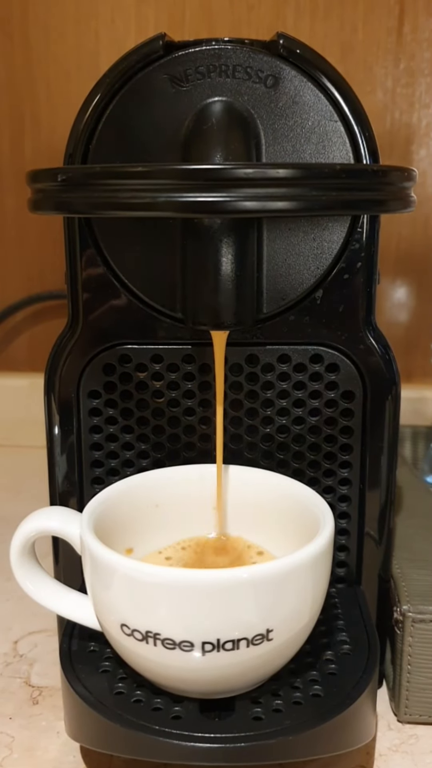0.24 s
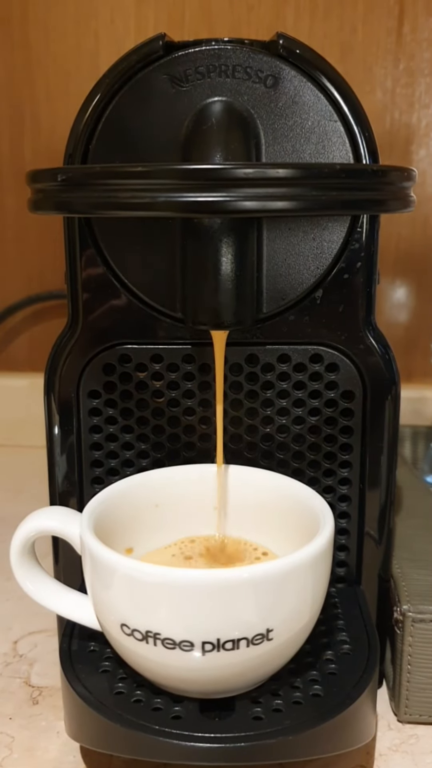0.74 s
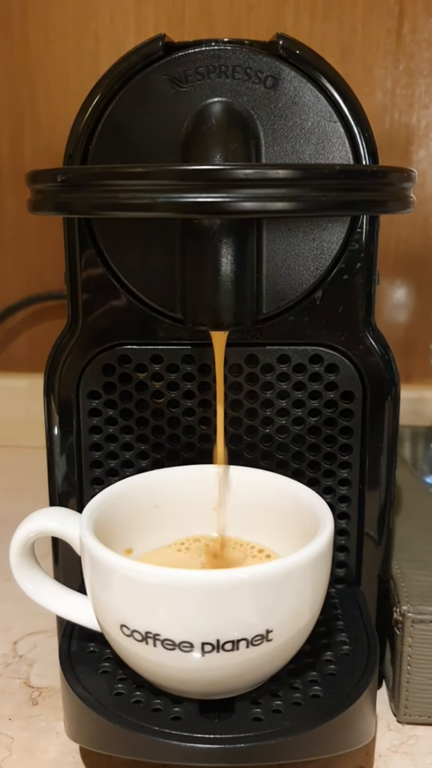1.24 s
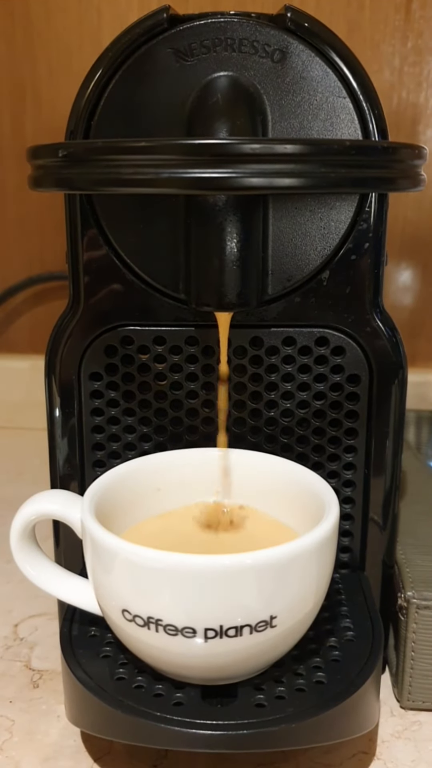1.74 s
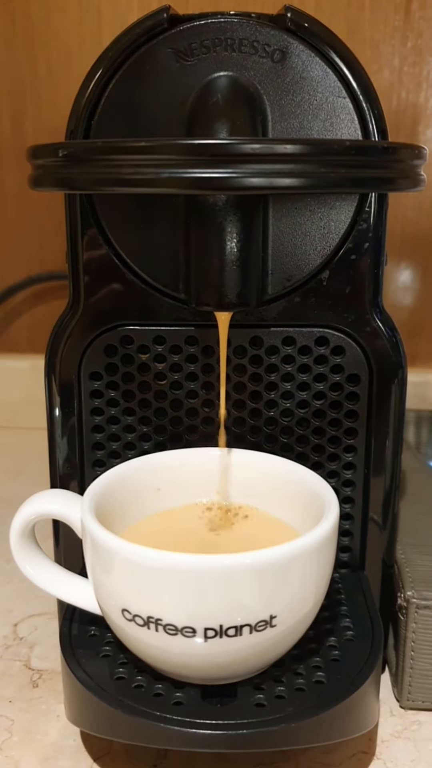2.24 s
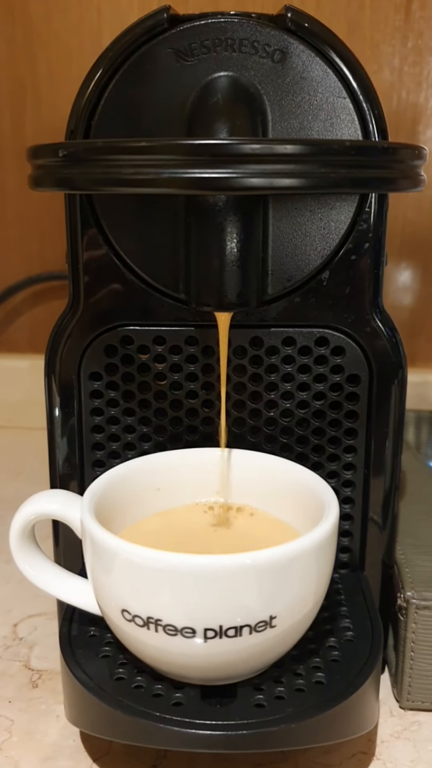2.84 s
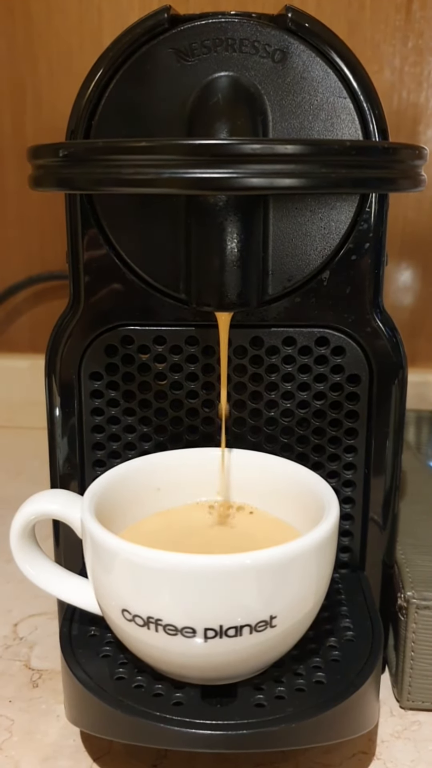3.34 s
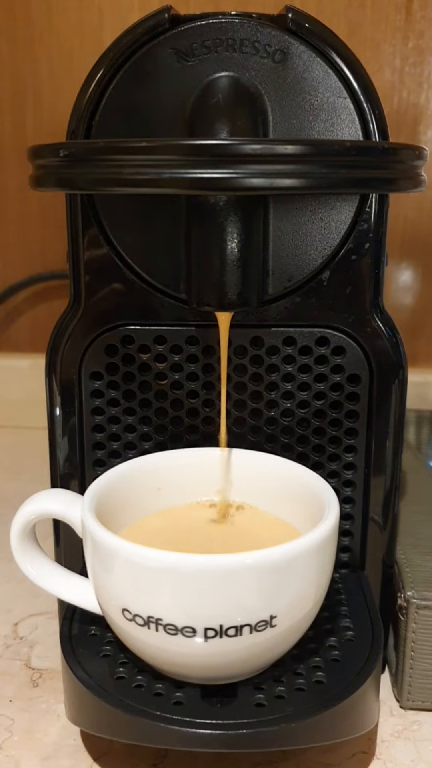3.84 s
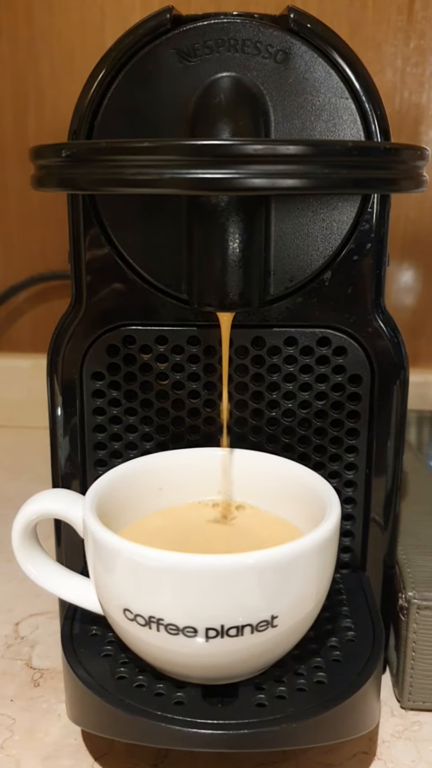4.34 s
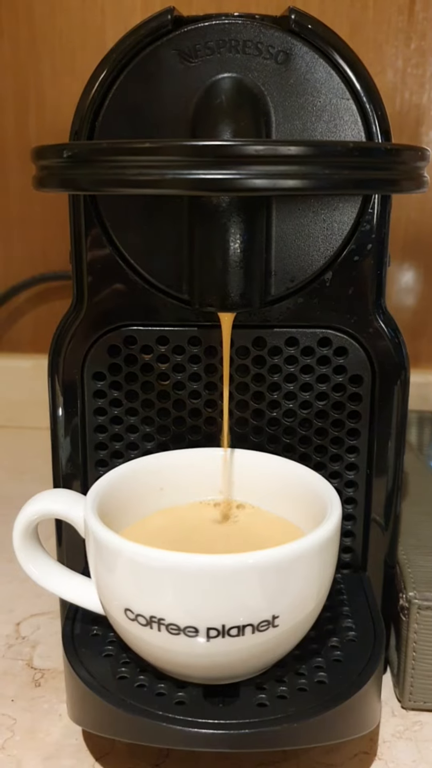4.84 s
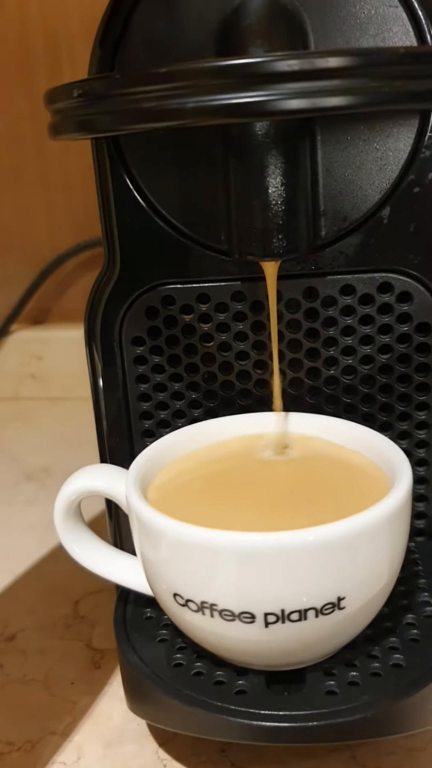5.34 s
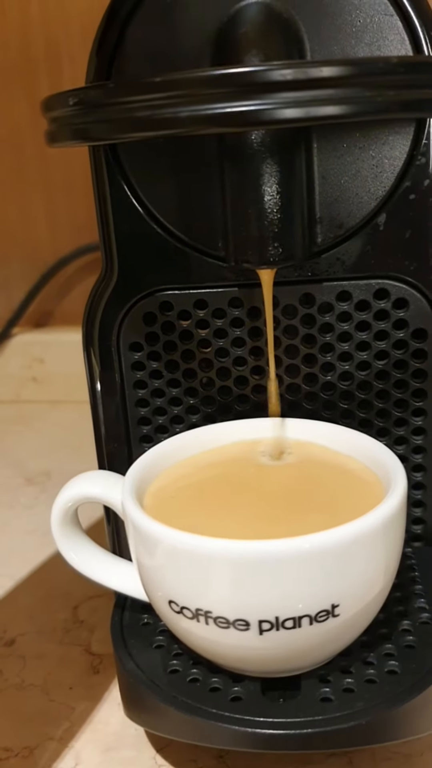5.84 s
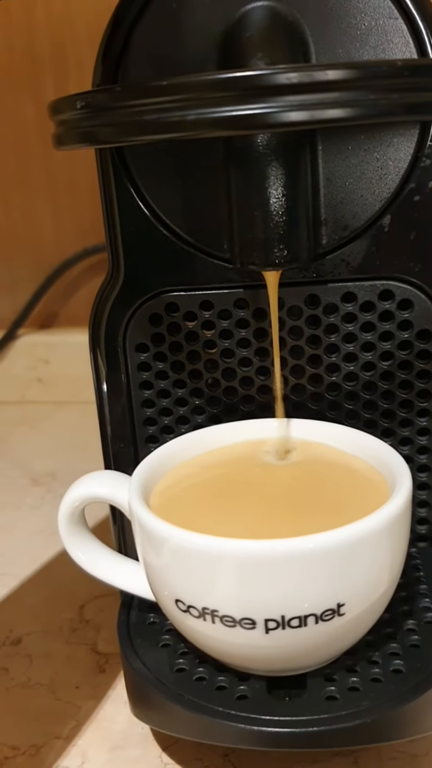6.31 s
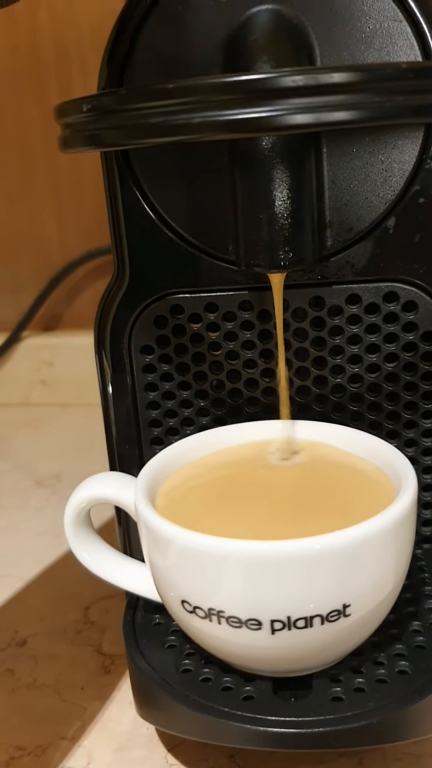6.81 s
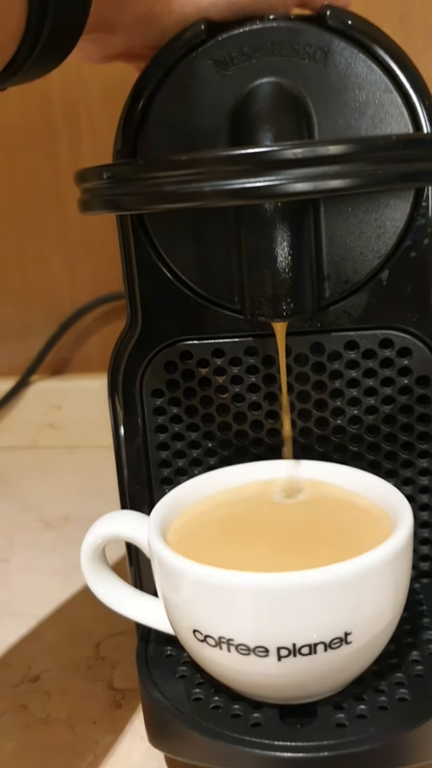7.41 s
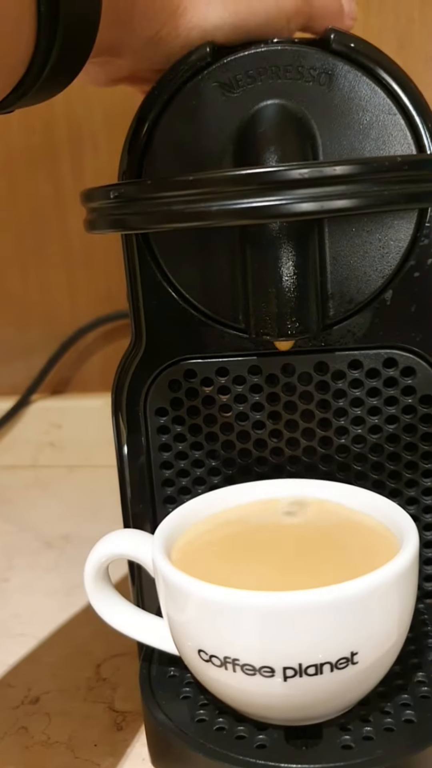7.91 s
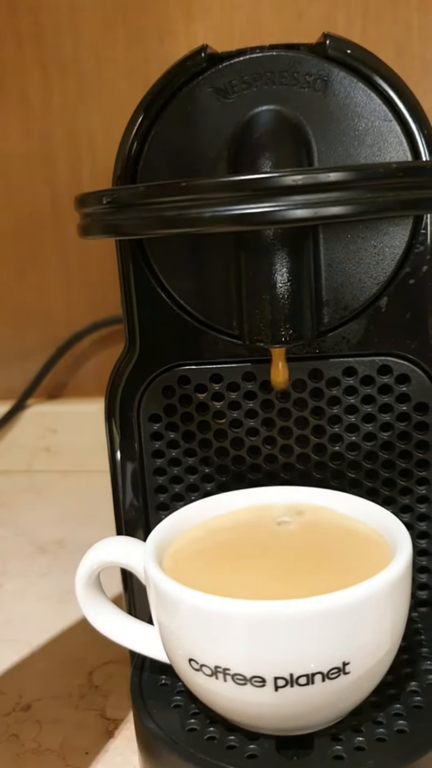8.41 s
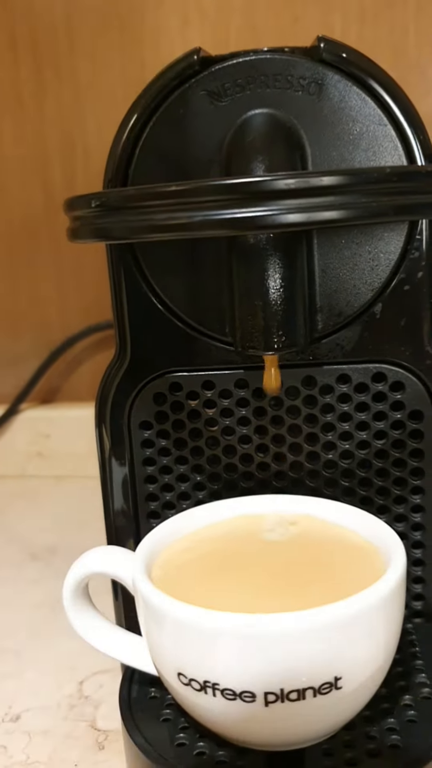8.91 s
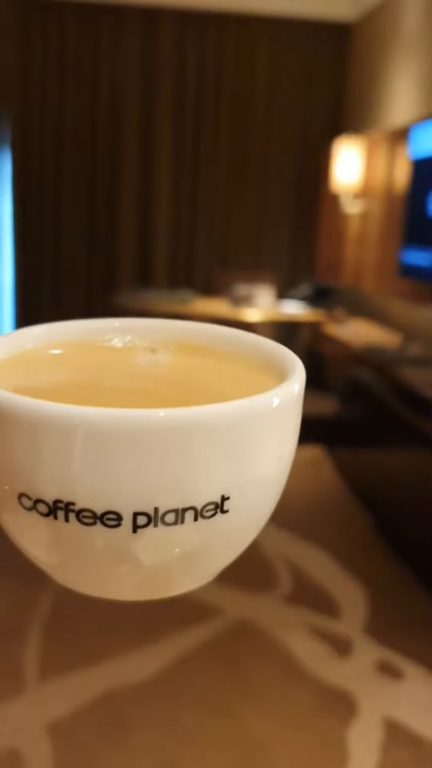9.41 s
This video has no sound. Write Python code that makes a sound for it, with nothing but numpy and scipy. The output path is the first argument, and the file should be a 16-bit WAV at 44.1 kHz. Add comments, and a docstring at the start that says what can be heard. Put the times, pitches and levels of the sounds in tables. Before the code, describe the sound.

A coffee machine pump buzzes and rattles as drops plop into a cup, then stops with a clunk and a few plastic ticks.

```python
"""A capsule coffee machine in a quiet room, heard from a hand-held stereo microphone.
The mains-driven piston pump buzzes its plastic housing, rattling hard at first and softer from 1.65 s,
while drops plop into the cup. At 5.4 s the pump stops; a lever clunks home and rocks to rest.
Plastic parts tick, escaping pressure whistles faintly, and a few dull knocks sound over the
microphone's low rumble and hiss."""
import sys
import numpy as np
from scipy import signal
from scipy.fft import rfft, irfft
from scipy.io import wavfile

SR = 44100
rng = np.random.default_rng(int(sys.argv[2]) if len(sys.argv) > 2 else 0)


def digitize_waveform(pressure):
    """Quantize a signal to 16-bit integers and store it at the path in sys.argv[1].

    Rows of a 2-D input are taken as channels; values are limited to [-1, 1].
    """
    field = np.atleast_2d(pressure).T
    bounded = np.clip(field, -1, 1)
    quanta = np.round(bounded * 32767).astype(np.int16)
    wavfile.write(sys.argv[1], SR, quanta)


N = 426094
TIME, HZ = np.arange(N) / SR, np.fft.rfftfreq(N, 1 / SR)
MAINS_HZ, SOFTER_S, STOP_S = 50.015, 1.653, 5.424


def hard_pump():
    """The pump's first stage: the piston strikes hard and the housing rattles brightly."""
    # mains overtones: multiple, start_db, end_db, pan_db, left_lead_rad
    overtones = [(1, -51, -52, 1, -0.4), (2, -45, -46, -8, 0.2), (3, -36, -36, 0, -0.1),
                 (4, -49, -49, 2, 0.3), (5, -51, -50, -1, -0.3), (6, -48, -47, -1, 0.0),
                 (7, -54, -51, -5, -0.4), (8, -46, -47, -3, 0.3), (9, -58, -57, 0, 0.1),
                 (10, -52, -60, 0, -0.0), (11, -42, -44, -2, -0.2), (12, -48, -56, -4, -0.2),
                 (13, -40, -42, -3, -0.3), (14, -50, -53, 3, -0.0), (15, -46, -53, -2, -0.9),
                 (16, -55, -54, -12, -1.5), (17, -50, -52, 7, 2.3), (18, -44, -45, -5, -1.8),
                 (19, -47, -53, -12, 1.9), (20, -45, -48, -8, 0.1), (21, -51, -52, 2, 2.1),
                 (22, -40, -41, -1, 3.1), (23, -45, -47, -2, 3.1), (24, -48, -53, -10, 0.6),
                 (25, -57, -54, -3, 1.7), (26, -55, -55, 1, 1.6), (27, -54, -55, 0, 1.8),
                 (28, -57, -59, -2, 2.9), (29, -56, -57, -5, 1.4), (30, -54, -56, -6, 1.4),
                 (31, -57, -57, 11, -1.4), (32, -60, -64, 2, -3.1)]
    # stroke noise: frequency_hz, density_db
    colour = [(24, -53.5), (40, -16), (147, -13.5), (243, -16), (402, -17.5), (491, -17.5), (646, -17.5),
              (715, -19.5), (3220, -20.5), (5870, -20.5), (7540, -28.5), (12100, -31.5), (16000, -44)]
    # rattling parts: pitch_hz, width_hz, delay_s, decay_s, pan_db
    parts = [(1850, 300, .014, .005, -2), (2350, 400, .014, .006, 0), (3800, 130, 0, .002, 2),
             (3950, 150, .015, .002, 2), (5270, 130, .001, .002, 3), (5760, 90, .0005, .002, 3),
             (5970, 100, .001, .003, 3), (6470, 90, .005, .002, 4), (9100, 400, .0005, .003, 5),
             (11800, 300, .001, .0015, 6), (14000, 1500, .001, .003, 6)]
    # loudness of each part: rms_db, change_over_stage_db
    levels = [(-52.5, -5.5), (-48.5, -0.5), (-44.5, -3), (-52.5, 3.5), (-51.5, -4), (-44, -1), (-46.5, 4.1),
              (-51, -1), (-59, -1), (-53, -0.5), (-62, -3.5)]
    t, strike = TIME[:round(SOFTER_S * SR)], .36   # strike: place in the mains cycle, 0-1
    buzz = piston_buzz(t, overtones, delay=.328, recoil=.275, smear_rad=-.03, phase_rad=1.03, waver_db=.25)
    hiss = stroke_hiss(t, strike, colour, rms_db=-46, decay_s=.016, steady=.15)
    rattle = rattles(t, strike, parts, levels, uneven_db=.8, repeat=6, firmness=.26)
    return add(np.zeros((2, N)), 0, buzz + hiss + rattle)


def soft_pump():
    """The pump's second stage: the buzz carries on with less rattle and a steadier hiss."""
    # mains overtones: multiple, start_db, end_db, pan_db, left_lead_rad
    overtones = [(1, -53, -54, 2, -0.3), (2, -50, -51, -8, 0.3), (3, -39, -40, 0, -0.1),
                 (4, -46, -45, 1, 0.2), (5, -44, -44, 0, -0.0), (6, -43, -44, 0, 0.2),
                 (7, -48, -48, -3, -0.2), (8, -51, -51, -4, 0.3), (9, -55, -51, 0, 0.1),
                 (10, -51, -59, 1, 0.0), (11, -40, -43, -1, -0.0), (12, -50, -58, -2, -0.2),
                 (13, -52, -60, -1, -0.3), (14, -52, -54, 1, -0.8), (15, -60, -61, -4, -0.3),
                 (16, -64, -64, -5, -0.4), (17, -53, -52, -7, 0.3), (18, -53, -55, -2, -2.6),
                 (19, -57, -60, -10, 2.6), (20, -61, -60, -9, 0.2), (21, -51, -51, -4, 2.3),
                 (22, -48, -55, -1, 2.4), (23, -70, -72, -8, 0.6), (24, -61, -57, 2, 1.4),
                 (25, -63, -74, 2, 0.8), (26, -65, -65, -1, -0.8), (27, -62, -60, -9, -2.2),
                 (28, -68, -68, 7, 1.7), (29, -65, -71, 1, 0.6), (30, -72, -80, -2, -1.9),
                 (31, -67, -68, -2, 1.8), (32, -68, -71, 6, -2.9)]
    # stroke noise: frequency_hz, density_db
    colour = [(24, -49.5), (40, -12), (151, -19.5), (305, -14.5), (491, -17), (542, -10), (770, -24.5),
              (852, -24), (2050, -23.5), (3100, -32.5), (4240, -27.5), (5870, -36), (13800, -42.5),
              (16000, -76.5)]
    # rattling parts: pitch_hz, width_hz, delay_s, decay_s, pan_db
    parts = [(1200, 500, .004, .006, -1), (2290, 200, .001, .008, -1), (2620, 200, .001, .005, 0),
             (3760, 200, .0005, .003, 0), (4260, 250, .004, .005, 0), (5420, 150, .001, .006, 0),
             (6610, 300, .001, .006, 1), (8000, 400, .005, .006, 2), (8900, 350, .0062, .006, 2),
             (13500, 1800, .0005, .01, 4)]
    # loudness of each part: rms_db, change_over_stage_db
    levels = [(-60, -0.5), (-61.5, -3.5), (-61.5, -10), (-62.5, 4.5), (-59, 3.5), (-71, 0.5), (-66, -5.3),
              (-70.5, -2), (-62.5, .1), (-62, -0.8)]
    t, strike = TIME[round(SOFTER_S * SR):round(STOP_S * SR)], .92
    buzz = piston_buzz(t, overtones, delay=.266, recoil=.575, smear_rad=.075, phase_rad=1.37, waver_db=.1)
    hiss = stroke_hiss(t, strike, colour, rms_db=-51, decay_s=.018, steady=.82)
    rattle = rattles(t, strike, parts, levels, uneven_db=.6, repeat=10, firmness=.13)
    return add(np.zeros((2, N)), SOFTER_S, buzz + hiss + rattle)


def piston_buzz(t, overtones, delay, recoil, smear_rad, phase_rad, waver_db):
    """Mains overtones line up as a smeared blow and its recoil; delay and recoil are in cycles."""
    along, out = (t - t[0]) / (t[-1] - t[0]), 0
    for k, start_db, end_db, pan_db, lead_rad in overtones:
        phase = 2 * np.pi * k * (MAINS_HZ * t - delay) + smear_rad * k * k + phase_rad
        phase += np.angle(1 - .85 * np.exp(-2j * np.pi * k * recoil))   # return blow, opposite in sign
        level_db = start_db + (end_db - start_db) * along + waver_db * np.sqrt(k) * drift(22)[:len(t)]
        tone = np.cos(phase + np.array([[.5], [-.5]]) * lead_rad)
        out = out + panned(amp(level_db) * tone, pan_db)
    return out


def stroke_hiss(t, strike, colour, rms_db, decay_s, steady):
    """Noise pulsed by each piston stroke, over a steady share that never stops."""
    # how alike left and right are: frequency_hz, correlation
    likeness = [(60, 1), (180, 1), (550, 0.55), (1650, 0.071), (4970, 0.62), (15000, -0.73)]
    # left over right: frequency_hz, pan_db
    balance = [(60, 6.5), (180, 4), (550, -3.5), (1650, 1), (4970, -4), (15000, 20)]
    noise = coloured(colour, at_hz(likeness, HZ), at_hz(balance, HZ))[:, :len(t)]
    return amp(rms_db) * rms_one(noise * (steady + bursts(t, strike, decay_s, uneven_db=2)))


def rattles(t, strike, parts, levels, uneven_db, repeat, firmness):
    """Each stroke shakes the plastic parts, and each part rings around its own pitch."""
    # strokes that barely rattle the parts: time_s
    weak_strokes = [.935, 1.315, 1.575]
    strength_db = 1.5 * rng.standard_normal(600)   # one per stroke; parts below 4 kHz follow it less
    strength_db[(np.array(weak_strokes) * MAINS_HZ - strike).astype(int) + 2] = -15
    from_middle, out = np.linspace(-.5, .5, len(t)), 0
    cycle_sample = (t * MAINS_HZ % 1 / MAINS_HZ * SR).astype(int)
    for (hz, width_hz, delay_s, decay_s, pan_db), (rms_db, change_db) in zip(parts, levels):
        recurring = repeat * np.exp(-(hz / 3200) ** 2) * rng.standard_normal(900)[cycle_sample]
        # every stroke rings the part as firmly, in a new phase and a little off pitch
        stroke = np.floor((t - delay_s) * MAINS_HZ - strike).astype(int) + 2
        phase = 2 * np.pi * rng.random(600)[stroke]
        pitch_hz = hz + .2 * width_hz * rng.standard_normal(600)[stroke]
        tone_gain = firmness * min(hz / 3000, 1) ** 4 * np.sqrt(min(width_hz, 250) / 100)
        tone = tone_gain * np.cos(2 * np.pi * pitch_hz * t + phase)
        shared = recurring + tone + rng.standard_normal(len(t))
        shaking = np.array([shared, np.roll(shared, round(SR / hz / 4))])   # right: a quarter wave late
        shaking += .97 * rng.standard_normal((2, len(t)))
        shaking *= bursts(t, strike + delay_s * MAINS_HZ, decay_s, uneven_db * min(hz / 4500, 1) ** 2)
        # parts near 2.4 kHz rattle harder just before the stop
        rougher_db = 8 * (t > 5.24) * np.exp(-(hz / 2400 - 1) ** 2 * 10)
        slow_db = change_db * from_middle + .66 * drift(2.8)[:len(t)]
        shaking *= amp(strength_db[stroke] * min(hz / 4000, 1) + slow_db + rougher_db)
        out = out + panned(amp(rms_db) * rms_one(ring(shaking, hz, 2.2 / width_hz)), pan_db)
    return out


def drops():
    """Each drop makes a splat and a short rising bubble, answered by the air in the cup."""
    # drops into the cup: start_s, bubble_db, bubble_hz, cup_re_bubble_db, splat_re_bubble_db
    falls = [(0.0864, -52.5, 1930, 11, -8.5), (0.2369, -39, 1760, -0.5, 6), (0.3277, -32.5, 1820, -9, -6.5),
             (0.4998, -31, 1830, -13, -6), (0.6194, -47.5, 2230, 1, 9), (0.8909, -41, 1900, -4.5, -2),
             (1.4436, -46.5, 2160, 2, -13), (1.9594, -53, 1840, 5, 2), (2.0777, -37.5, 1710, -4, -1),
             (2.1201, -41, 1800, -4, 6.5), (2.7, -52, 1830, -6, -2), (2.859, -55, 1850, -8, 15),
             (3.13, -50, 1850, -12, 4), (3.187, -47.5, 1840, -9, 5), (3.995, -53, 1830, -6, -2)]
    # spray of a drop: frequency_hz, density_db
    spray = [(500, -33.5), (900, -7.5), (2000, -3.5), (3400, -4.5), (6000, -14), (12000, -30.5)]
    t, out = np.arange(2000) / SR, np.zeros((2, N))
    for start_s, level_db, hz, cup_db, splat_db in falls:
        bubble = np.sin(2 * np.pi * hz * t * (1 + 4 * t)) * t / .0016 * np.exp(1 - t / .0016)
        cup_hz = 833 + 50 * rng.standard_normal()
        cup = np.sin(2 * np.pi * cup_hz * t) * t / .006 * np.exp(1 - t / .006)
        splat = crack(spray, decay_s=.0032)[:len(t)]
        plop = bubble + amp(cup_db) * cup + amp(splat_db) * splat
        add(out, start_s, panned(amp(level_db) * plop, 0))
    return out


def lever():
    """Each contact is a dry crack, much alike from hit to hit, and a push into the housing's modes."""
    # lever clunking home: start_s, level_db, body_re_level_db, pan_db, snap_re_usual_db
    clunks = [(5.532, -33.5, 2, 11, 29), (5.5363, -38, 17, -1, 4.5), (5.548, -54.5, 14.5, -15, 1),
              (5.5629, -58.5, 0.5, -37, 4.5), (5.877, -26.5, -23, 4.5, 29.5), (5.9279, -55, 10.5, -1, -1)]
    # lever rocking to rest: start_s, level_db
    rocking = [(5.95, -30.5), (6.0034, -35), (6.0586, -37.5), (6.1167, -38.5), (6.1723, -39.5),
               (6.22, -44.5), (6.261, -41), (6.3029, -45.5), (6.3405, -49.5), (6.379, -56), (6.4188, -64)]
    # the dry crack: frequency_hz, density_db
    crack_colour = [(100, -55), (600, -20), (1500, -17), (2600, -6), (3400, -6), (3900, 2), (4300, -4),
                    (4800, 2), (5600, -10), (7000, -13), (8000, -20), (11000, -21), (15000, -42)]
    # bright edge of a hard contact: frequency_hz, density_db
    snap_colour = [(2000, -31), (6000, -3), (10000, -6.5), (13000, -13), (16000, -25)]
    # damped modes of the housing: pitch_hz, level_db, t60_s
    modes = [(310, -7, .04), (440, -5, .035), (565, 0, .035), (673, -2, .03), (855, -5, .022),
             (1190, -7, .02), (1476, -8, .014), (1740, -9, .014)]
    out, usual_crack = np.zeros((2, N)), crack(crack_colour, decay_s=.0012)
    push = np.pad(np.hanning(12), (0, 3988))
    # while the lever rocks, the housing's ring falls 19.5 dB a second
    rocks = [(s, db, -49.5 - 19.5 * (s - rocking[0][0]) - db, 2.5, -16) for s, db in rocking]
    for start_s, level_db, body_db, pan_db, snap_db in clunks + rocks:
        tick = .68 * usual_crack + .61 * crack(crack_colour, decay_s=.00363)
        snap = amp(snap_db - 34.5) * crack(snap_colour, decay_s=.0015)
        body = sum(amp(db + rng.normal(0, .88)) * rng.choice([-1, 1]) * ring(push, hz, t60_s)
                   for hz, db, t60_s in modes)
        contact = tick + snap + amp(body_db) * peak_one(body)
        add(out, start_s, panned(amp(level_db) * contact, pan_db))
    return out


def plastic_ticks():
    """Plastic parts tick: milliseconds of crackle, broadly coloured around each tick's brightness."""
    # ticks: start_s, peak_db, brightness_hz, pan_db, body_db
    ticks = [(5.715, -48.5, 2480, 6, 10.5), (5.7977, -68, 6560, 9, -8), (5.842, -68, 4720, 10.5, -26),
             (6.5538, -33, 4050, 5, -8.5), (6.6635, -65, 8000, 17.5, -10), (6.7466, -56.5, 6910, 13, -11.5),
             (6.7839, -38.5, 3970, 5.5, -9.5), (7.215, -59.5, 6800, 13.5, -16),
             (7.2389, -58.5, 7000, 14.5, -15), (7.3552, -63.5, 8770, 7, -4), (7.437, -40, 4540, 5.5, -5),
             (8.0934, -48, 6610, 11, -3), (8.103, -37.5, 6450, 3, -1), (8.1274, -55, 6220, -13, 6),
             (8.2556, -64, 2500, 0.1, -6), (9.298, -75, 1200, -2, 12), (9.392, -69, 1670, -5.5, 7)]
    out = np.zeros((2, N))
    for start_s, peak_db, hz, pan_db, body_db in ticks:
        colour = [(100, -50), (400, body_db - 4), (hz * .57, body_db), (hz, 0),
                  (max(hz * 1.13, 7300), -5), (9300, -13.5), (15500, -28.5)]
        add(out, start_s, panned(amp(peak_db) * crack(colour, decay_s=.0017), pan_db))
    return out


def dull_knocks():
    """Soft puffs of noise ring briefly at a low pitch."""
    # knocks: start_s, peak_db, pitch_hz, pan_db
    knocks = [(5.471, -33.5, 430, -2), (5.484, -37, 292, 0), (5.494, -47, 246.7, -1.5),
              (8.29, -60, 710, -2), (8.297, -60, 800, -10), (8.315, -53.5, 561, 3), (8.965, -57.5, 125, -9),
              (9.293, -59.5, 176, -15), (9.305, -62.5, 130, -16.5), (9.466, -72, 500, -6.5)]
    t, out = np.arange(4000) / SR, np.zeros((2, N))
    for start_s, peak_db, hz, pan_db in knocks:
        puff = rng.standard_normal(len(t)) * t * np.exp(-t / .00063)
        add(out, start_s, panned(amp(peak_db) * peak_one(ring(puff, hz, 18 / hz)), pan_db))
    return out


def pressure_whistle():
    """Escaping pressure whistles faintly in a narrow band of noise."""
    # swell and fade of the whistle: time_s, level_db
    swell = [(6.75, -110), (6.85, -84), (7.14, -80), (7.3, -105)]
    whistle = rms_one(ring(rng.standard_normal((2, N)), hz=6740, t60_s=.0091))
    return amp(np.interp(TIME, *np.transpose(swell))) * whistle


def high_hiss(start_s=6.555, level_db=-81, t60_s=1.5):
    """A faint high hiss dies away after the loudest tick."""
    hiss = rms_one(ring(rng.standard_normal((2, N)), hz=13500, t60_s=.0012))
    return hiss * amp(level_db - 60 * (TIME - start_s).clip(0) / t60_s) * (TIME > start_s)


def room(x):
    """The room's diffuse tail: noise dying octave by octave, unrelated in the two channels."""
    # reverberation time: frequency_hz, t60_s
    decay = [(140, 0.19), (1000, 0.3), (4000, 0.241), (12000, 0.23)]
    t, edges_hz, tail = np.arange(22000) / SR, 100 * 2. ** np.arange(8), 0
    for low, high in zip(edges_hz, edges_hz[1:]):
        octave = signal.butter(2, [low, high], "band", fs=SR, output="sos")
        band = signal.sosfilt(octave, rng.standard_normal((2, len(t))))
        tail = tail + band * amp(-60 * t / at_hz(decay, np.sqrt(low * high)))
    tail *= 1 - np.exp(-t / .0017)
    tail /= np.linalg.norm(tail, axis=1, keepdims=True)
    return signal.fftconvolve(x, tail, axes=1)[:, :N]


def handling_rumble():
    """The held microphone rumbles in uneven lumps, heard once the pump has stopped."""
    # course of the rumble: time_s, level_db, pan_db
    course = [(5.45, -69, -1), (5.7, -69, -5.5), (6.15, -70.5, -6), (6.8, -68, -5.5), (7.55, -67.5, -8),
              (7.95, -75, -3), (8.1, -70.5, -0.5), (8.7, -68.5, -7.5), (9.2, -71.5, -4), (9.32, -62.5, -12),
              (9.5, -73, -4), (9.66, -80, -5)]
    # rumble spectrum: frequency_hz, density_db
    colour = [(12, -51), (20, -20), (32, -10), (53, 13), (187, -8.5), (218, -5), (245, -23.5), (600, -28),
              (780, -39), (1320, -120)]
    time_s, level_db, pan_db = np.transpose(course)
    level_db = np.interp(TIME, time_s, level_db) + 2.5 * drift(20)
    pan_db = np.interp(TIME, time_s, pan_db) + 2.5 * drift(20)
    return panned(amp(level_db) * coloured(colour, likeness=.64), pan_db) * (TIME > STOP_S)


def microphone_hiss(level_db=-79, step_s=9.39, rise_db=2):
    """A quiet background hiss that steps up slightly near the end."""
    # hiss spectrum: frequency_hz, density_db
    colour = [(150, -20), (250, 0), (775, -12), (1060, -12), (1500, -12), (1950, -13), (2910, -12.5),
              (5160, -20), (16000, -18.5)]
    return amp(level_db + rise_db * (TIME > step_s)) * coloured(colour, likeness=.029)


def bursts(t, strike, decay_s, uneven_db):
    """An envelope that swells once a mains cycle and dies; each stroke has its own strength."""
    cycles = t * MAINS_HZ - strike
    age_s = cycles % 1 / MAINS_HZ
    strength = amp(uneven_db * rng.standard_normal(600))[np.floor(cycles).astype(int) + 2]
    return strength * (1 - np.exp(-age_s / .002)) ** 2 * np.exp(-age_s / decay_s)


def crack(colour, decay_s):
    """A short burst of coloured noise with a faint tail; peak 1."""
    t = np.arange(4000) / SR
    gain = amp(at_hz(colour, np.fft.rfftfreq(len(t), 1 / SR)))
    noise = irfft(rfft(rng.standard_normal(len(t))) * gain)
    attack = (1 - np.exp(-t / .00028)) ** 2
    return peak_one(noise * attack * (np.exp(-t / decay_s) + .12 * np.exp(-t / .0097)))


def coloured(colour, likeness, pan_db=0):
    """Stereo noise of a given spectrum and left-right likeness; rms 1."""
    mid, side = rfft(rng.standard_normal((2, N)))
    both = np.sqrt(1 + likeness) * mid + np.sqrt(1 - likeness) * side * [[1], [-1]]
    return rms_one(irfft(panned(both * amp(at_hz(colour, HZ)), pan_db), N))


def ring(x, hz, t60_s):
    """A damped resonance: a unit click sets a sine of height 1 ringing."""
    r, w = amp(-60 / (t60_s * SR)), 2 * np.pi * hz / SR
    return signal.lfilter([0, np.sin(w)], [1, -2 * r * np.cos(w), r * r], x + 1e-18)


def drift(rate_hz):
    """A slow wander: random points of spread 1 joined by straight lines."""
    return np.interp(TIME * rate_hz, np.arange(2000), rng.standard_normal(2000))


def at_hz(points, hz):
    """A curve's value at hz, on a log frequency axis."""
    points_hz, values = np.transpose(points)
    return np.interp(np.log(hz + 1), np.log(points_hz), values)


def panned(x, pan_db):
    """Stereo with the left channel pan_db above the right."""
    return amp(np.multiply.outer([.5, -.5], pan_db)).reshape(2, -1) * x


def add(out, start_s, sound):
    """Mix a sound into out at start_s."""
    i = round(start_s * SR)
    out[:, i:i + sound.shape[1]] += sound[:, :N - i]
    return out


def amp(db):
    return 10 ** (np.asarray(db) / 20)


def rms_one(x):
    return x / np.sqrt(np.mean(x ** 2) + 1e-20)


def peak_one(x):
    return x / abs(x).max()


def scene():
    """The machine and its room, as they reach the microphone."""
    hard, soft = hard_pump(), soft_pump()
    hits = drops() + lever() + plastic_ticks() + dull_knocks()
    lingering_buzz = amp(-10.5) * room(soft) * (TIME > STOP_S)
    machine = hard + soft + lingering_buzz + hits + amp(-5) * room(hits)
    return machine + handling_rumble() + pressure_whistle() + high_hiss() + microphone_hiss()


def record(dry):
    """The recorder cuts the top steeply: 60 dB down from 16.46 kHz."""
    return signal.sosfilt(signal.cheby2(16, 60, 16460, fs=SR, output="sos"), dry)


dry = scene()
out = record(dry)
digitize_waveform(out)
```